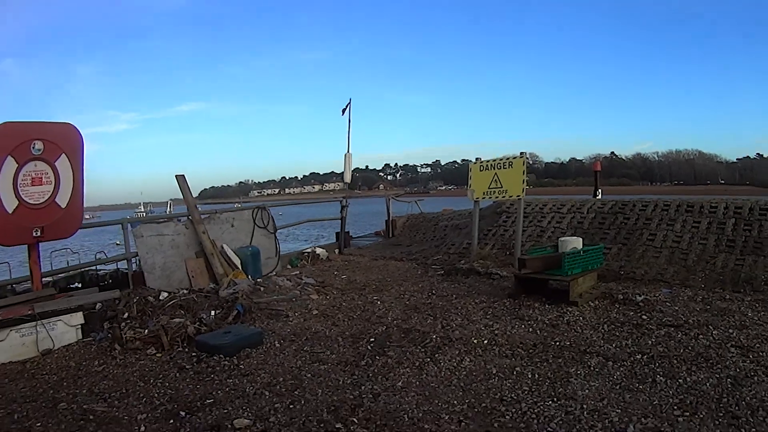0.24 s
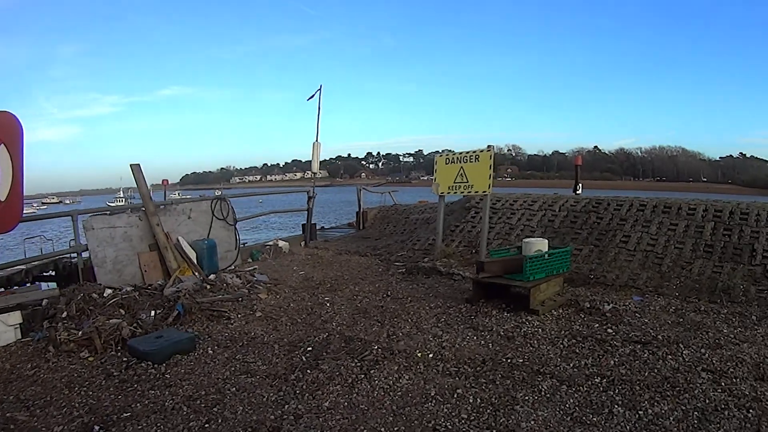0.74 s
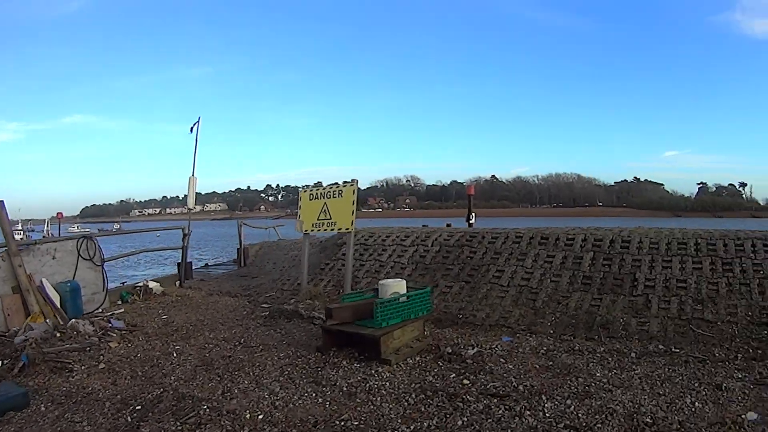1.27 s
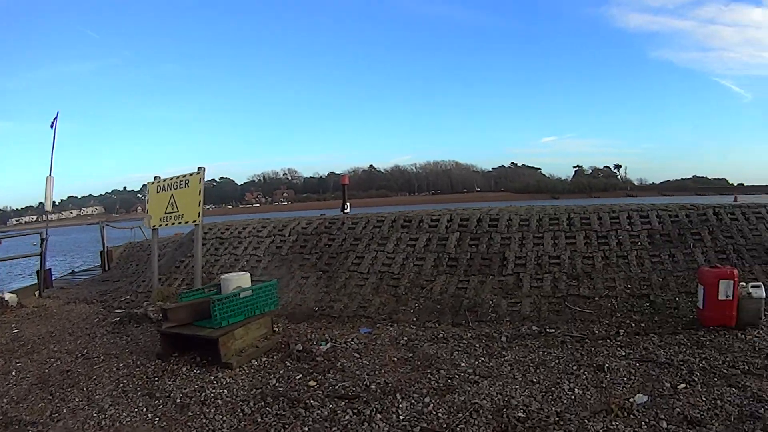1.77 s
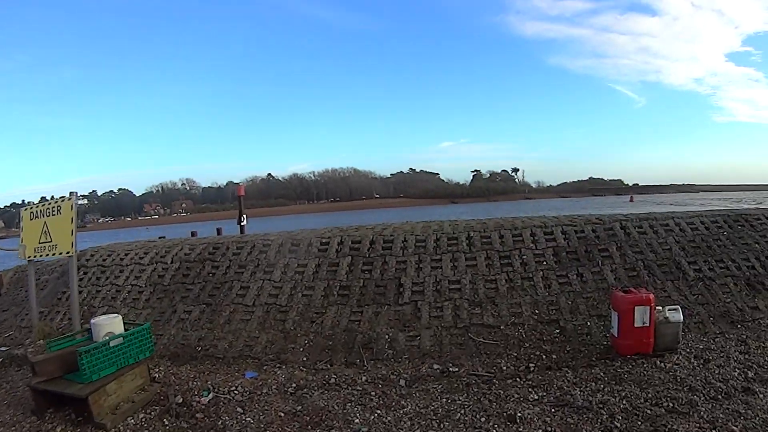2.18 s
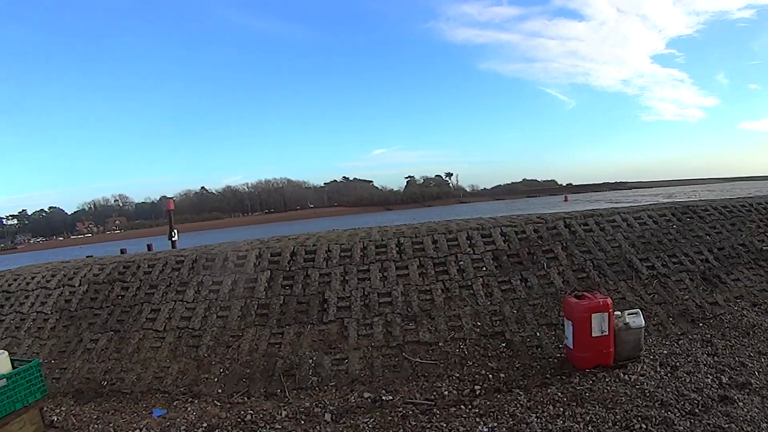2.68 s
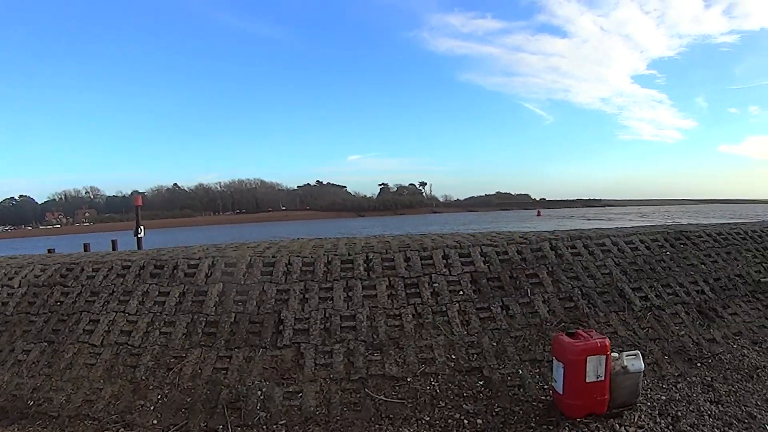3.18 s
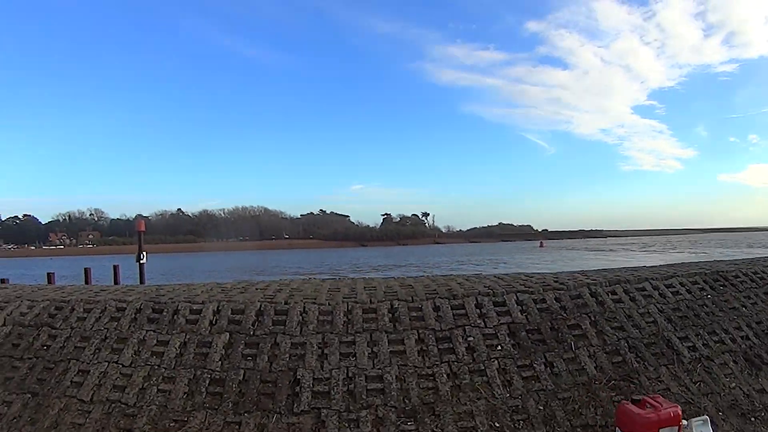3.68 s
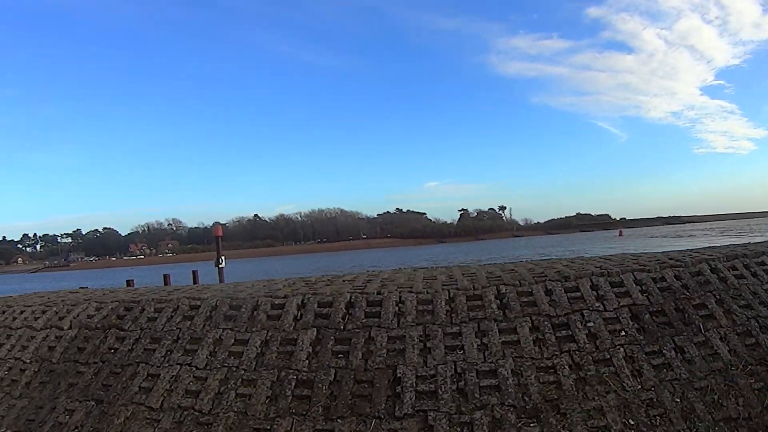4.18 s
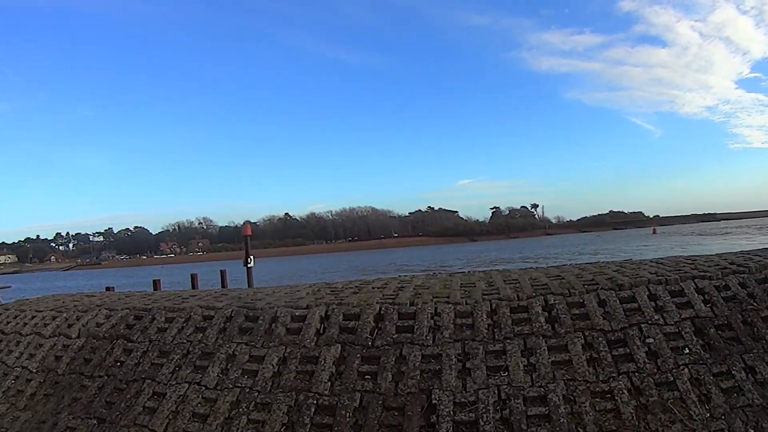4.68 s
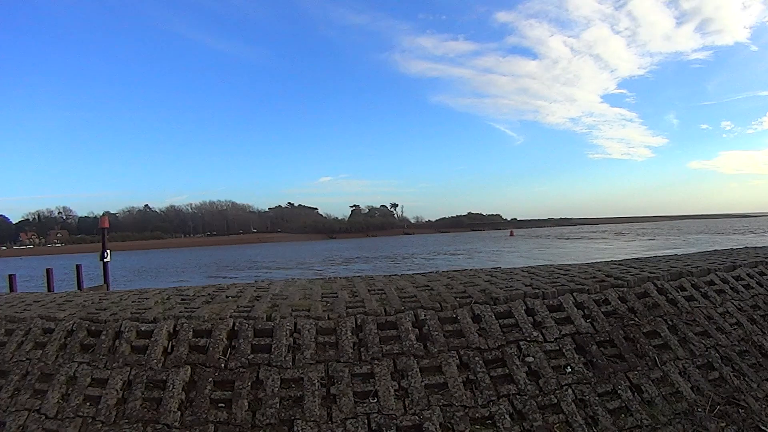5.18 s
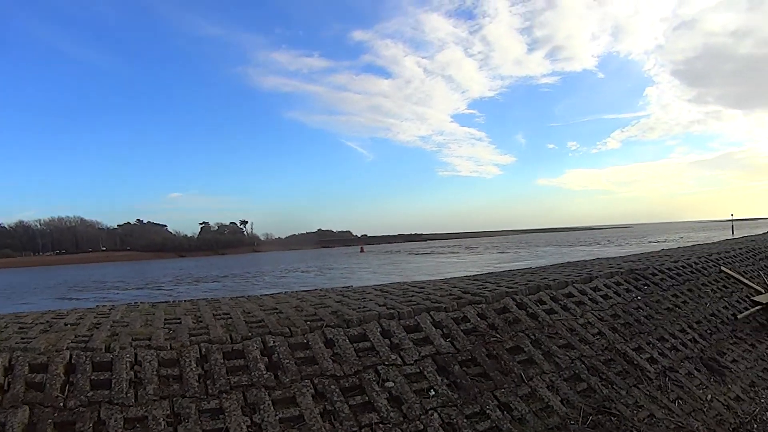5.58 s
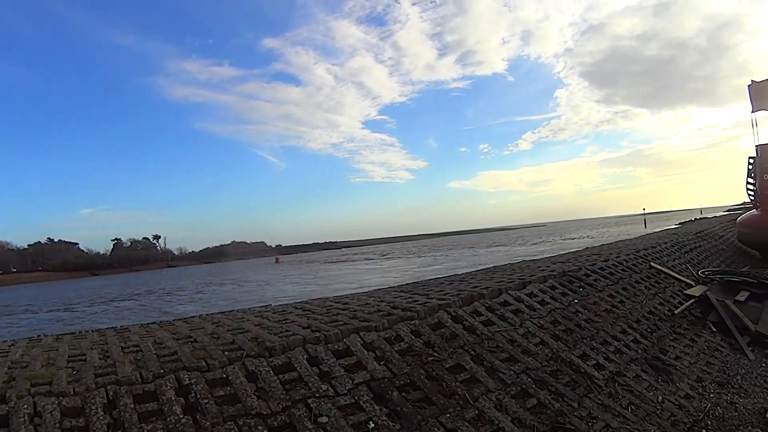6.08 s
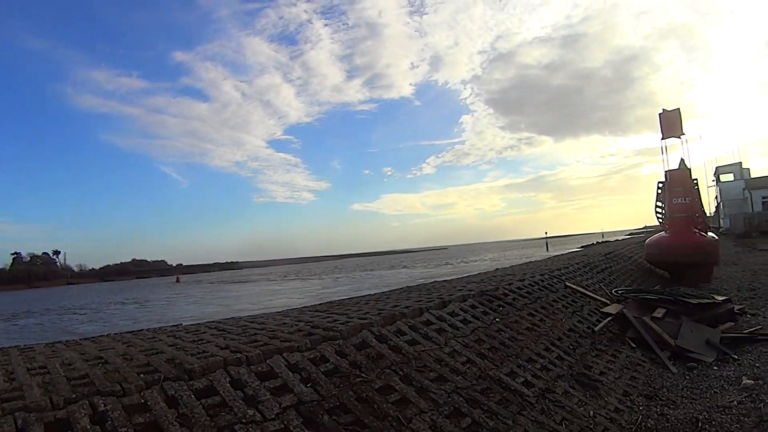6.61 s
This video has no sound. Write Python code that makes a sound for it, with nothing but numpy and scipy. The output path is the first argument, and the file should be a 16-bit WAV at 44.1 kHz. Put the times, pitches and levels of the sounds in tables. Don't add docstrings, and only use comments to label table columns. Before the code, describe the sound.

A person walks on a shingle beach with a small camera sealed in a plastic housing, so all contacts sound close, boxy and hollow, with little bass and a clipped treble. Irregular crunches swell around 0.2, 0.9, 1.7 and 2.6 seconds, made of gritty grains, hard pebble snaps and tiny high pings, with loose stones settling between. A strap brushes the case early and knocks it at 1.75 and 2.4. Another step at 3.4 runs into a heavy thump and knock at 3.5. Rubbing and creaking plastic follow, with a knock at 4.4, a soft drag near 5.0, two loud hard knocks at 5.4, a sudden scrape at 5.6 and a last knock at 5.8. Then steps alone crunch at 5.9 and 6.3, thinning to small clicks until about 6.9. Faint breeze rumble, distant water, hiss and a thin whine lie beneath.

```python
import sys
import numpy as np
from scipy import signal
from scipy.fft import rfft, irfft
from scipy.io import wavfile
from scipy.ndimage import uniform_filter1d

SR = 44100
rng = np.random.default_rng(int(sys.argv[2]) if len(sys.argv) > 2 else 0)


def decibels_to_gain(level_db):
    exponent = np.asarray(level_db, float) / 20
    return 10 ** exponent


def generate_wav(sig):
    pcm = np.round(np.clip(np.atleast_2d(sig).T, -1, 1) * 32767).astype(np.int16)
    wavfile.write(sys.argv[1], SR, pcm)


N = 302085

# start_s [s], peak_db [dB], body_share_db [dB]
THUMP_EVENTS = [(1.769, -74, -5), (2.401, -45.5, -2), (2.563, -56, 7.5), (2.609, -54, -2),
                (2.63, -56.5, 6.5), (3.527, -40, -17), (3.535, -23, 0.5), (4.243, -40, -19),
                (4.402, -40.5, -3), (4.96, -46, -13), (5.37, -29, 4), (5.455, -34.5, 6.5),
                (5.474, -38.5, -7), (5.577, -44, -6), (5.723, -34.5, -6), (5.7676, -36, -7),
                (5.831, -46, -8)]
# start_s [s], peak_db [dB], pitch_hz [Hz], first_tick_db [dB]
PING_EVENTS = [(0.388, -47.5, 7500, -2), (2.915, -53.5, 8700, -2), (1.073, -47, 7460, -10),
               (1.2553, -44, 5700, -4), (1.433, -43, 9570, -15), (1.431, -45.5, 5560, -15),
               (1.444, -47, 5450, -15), (0.7297, -53, 6770, -15), (1.738, -47, 7650, -15),
               (1.769, -43, 7620, -15), (2.2887, -51, 7730, -15), (4.9492, -42, 7620, -15),
               (6.2851, -51, 5350, -12), (6.349, -45, 5420, -12), (2.56, -37.5, 5440, -19),
               (2.7206, -39, 6070, -8), (2.7212, -38.5, 9500, -12), (4.3048, -42, 9000, -1),
               (4.733, -36, 9080, -8), (4.8868, -42, 5500, -8), (4.886, -39.5, 9800, -15),
               (5.397, -29, 7640, -25), (5.4551, -18, 5640, -15), (6.6503, -45.5, 7580, -11.5)]
RUB_ROUND = 1.2


def unit(x):
    return x / np.sqrt(np.mean(x ** 2))


def ring(x, hz, width_hz, pan_db, lead, sway=0):
    coupling = 2.37
    widths_hz = width_hz * np.array([1, coupling])
    mode, wall = np.exp((2j * np.pi * hz - np.pi * widths_hz) / SR)
    gain = (1 - abs(mode)) * (1 - abs(wall))
    z = signal.lfilter([gain], [1, -mode - wall, mode * wall], x)
    alike = np.cos(lead / 2) * z.imag
    opposed = (np.sin(lead / 2) + sway) * z.real
    return np.array([decibels_to_gain(pan_db / 2) * (alike + opposed), decibels_to_gain(-pan_db / 2) * (alike - opposed)])


def walk(rate):
    hold = int(SR / rate)
    steps = np.repeat(rng.standard_normal(N // hold + 1), hold)
    return unit(uniform_filter1d(steps, hold)[:N])


def grains(per_s, spread_db, dense):
    size = decibels_to_gain(spread_db * np.minimum(rng.exponential(size=N), 3.0))
    hits = (rng.random(N) < per_s / SR) * size * rng.standard_normal(N)
    return unit(unit(hits) + dense * rng.standard_normal(N))


def swells(s, db, swell_s, fade_s, rounded=1):
    step = 64
    late = np.arange(0, N + step, step) / SR - np.asarray(s)[:, None]
    rising, falling = -late / np.reshape(swell_s, (-1, 1)), late / np.reshape(fade_s, (-1, 1))
    away = np.where(late < 0, rising, falling)
    level_db = np.maximum(db[:, None] - 10 * away ** rounded, -200)
    power = np.sum(decibels_to_gain(level_db) ** 2, axis=0)
    return np.interp(np.arange(N) / step, np.arange(len(power)), power)


def knocks(s, peak_db, hz, rattle_ms, scatter_db, blow):
    t = np.arange(512)
    rise_ms = 0.7
    fade = np.exp(-1000 * t / (rattle_ms * SR))
    rise = np.tanh(1000 * t / (rise_ms * SR))
    rattle = rng.standard_normal((len(s), len(t))) * fade * rise
    rattle[:, 0] += blow * np.sqrt(np.sum(rattle ** 2, axis=1))
    at_mode = abs(np.sum(rattle * np.exp(-2j * np.pi * hz * t / SR), axis=1))
    energy = 0.7 * at_mode ** 2 + 0.3 * np.sum(rattle ** 2, axis=1)
    size = decibels_to_gain(peak_db + scatter_db * rng.standard_normal(len(s))) / np.sqrt(energy)
    out = np.zeros(N + len(t))
    np.add.at(out, (s * SR).astype(int)[:, None] + t, size[:, None] * rattle)
    return out[:N]


def part(modes, steady, s, knock_db, rattle_ms, scatter_db, own, spread, blow):
    power = sum(decibels_to_gain(db) ** 2 * np.pi * width / SR / 5 for hz, width, db, *_ in modes)
    chance = rng.standard_normal(N)
    sway = spread * walk(120)
    out = 0
    for hz, width, db, pan_db, lead in modes:
        share = (1 + own * np.roll(chance, rng.integers(N))) / np.hypot(1, own)
        drive = steady * share + knocks(s, knock_db, hz, rattle_ms, scatter_db, blow)
        out = out + ring(decibels_to_gain(db) * drive, hz, width, pan_db, lead, sway)
    return out / np.sqrt(power)


def contacts():
    # peak_s [s], level_db [dB], swell_s [s], fade_s [s]
    crunch_events = [(0.04, -53, 0.25, 0.12), (0.174, -41, 0.032, 0.057), (0.32, -54.5, 0.27, 0.12),
                     (0.936, -39.5, 0.074, 0.081), (1.05, -48, 0.065, 0.046), (1.41, -53, 0.2, 0.11),
                     (1.57, -48.5, 0.017, 0.1), (1.764, -35.5, 0.029, 0.018), (1.9, -52, 0.31, 0.033),
                     (2.079, -51.5, 0.11, 0.055), (2.37, -52, 0.38, 0.13), (2.566, -43, 0.027, 0.079),
                     (2.644, -47.5, 0.07, 0.062), (2.77, -60, .1, 0.14), (3.378, -42, 0.084, 0.038),
                     (4.139, -41, 0.025, 0.038), (4.256, -44, 0.035, 0.076), (4.41, -50, 0.051, 0.08),
                     (4.755, -49, 0.044, .15), (4.833, -44.5, 0.12, 0.077), (5.005, -43, 0.04, 0.04),
                     (5.18, -47, 0.078, 0.026), (5.82, -42, 0.098, 0.018), (5.937, -53, 0.14, 0.091),
                     (6.158, -49.5, 0.077, 0.049), (6.356, -46.5, 0.063, 0.16), (6.55, -73, .15, 0.09),
                     (6.739, -74, 0.074, 0.038), (6.85, -63, 0.044, .05)]
    # peak_s [s], level_db [dB], swell_s [s], fade_s [s], pressure_db [dB]
    brush_events = [
        (0.146, -48, 0.0065, 0.04, -10),
        (0.33, -54, 0.26, 0.1, -12),
        (1.764, -49.5, 0.016, 0.081, -6),
        (2.409, -56, 0.016, 0.033, 5.5),
        (2.6, -56, 0.08, 0.12, -2),
        (2.08, -57.5, 0.18, 0.33, -9),
    ]
    # peak_s [s], level_db [dB], swell_s [s], fade_s [s], pressure_db [dB]
    rub_events = [(3.49, -54.5, 0.2, 0.034, -10), (3.553, -41.5, 0.029, 0.056, 0),
                  (3.63, -50.5, 0.076, 0.0085, 3), (3.925, -46, 0.05, 0.034, 2),
                  (4.139, -50, 0.075, 0.059, -3), (4.256, -51, 0.042, 0.051, 2.5),
                  (4.41, -48, 0.055, 0.097, 5), (4.53, -51, 0.3, .03, -2.5),
                  (4.755, -51.5, 0.055, 0.044, -2), (4.968, -36.5, 0.032, 0.058, -0.5),
                  (5.18, -52, 0.16, 0.026, -0.5), (5.303, -48.5, 0.044, 0.2, -0.5),
                  (5.386, -44.5, 0.026, 0.029, 7.5), (5.46, -52.5, .05, 0.035, 5),
                  (5.582, -39.5, 0.0083, 0.047, 3), (5.64, -46, 0.038, 0.021, 0),
                  (5.43, -51, 0.036, 0.042, -14), (5.781, -45, 0.098, 0.015, 1),
                  (5.937, -53.5, 0.14, 0.1, 2.5), (6.356, -56, 0.041, 0.48, -2),
                  (6.74, -63.5, 0.11, .05, 6.5)]
    # level_db [dB] in cavity, wall, ports, shell
    rest_db = (-63.5, -74, -73.5, -74.5)
    step = swells(*np.transpose(crunch_events), 1.14)
    s, db, swell_s, fade_s, pressure_db = np.transpose(brush_events + rub_events)
    rub = swells(s, db, swell_s, fade_s, RUB_ROUND)
    pressed = swells(s, db + pressure_db, swell_s, fade_s, RUB_ROUND)
    in_wall = decibels_to_gain(-14) ** 2 * step + rub
    in_ports = decibels_to_gain(-19) ** 2 * step + decibels_to_gain(-5) ** 2 * rub
    in_shell = decibels_to_gain(-21) ** 2 * step + pressed
    powers = [step, in_wall, in_ports, in_shell]
    levels = [np.sqrt(power + decibels_to_gain(rest) ** 2) for power, rest in zip(powers, rest_db)]
    return levels + [decibels_to_gain(3) * np.sqrt(rub)]


def blows():
    # start_s [s],
    # peak_db [dB], hardness_db [dB]
    stone_events = [(0.149, -31.5, -1), (0.182, -28, -7), (0.39, -33.5, 2), (0.8968, -41, 8),
                    (0.9281, -20, -17), (0.946, -33, -6), (0.988, -30, -3), (1.615, -32, 1.5),
                    (1.6785, -32, -5), (1.699, -35.5, 9.5), (1.921, -36, 3), (2.5664, -31, 0),
                    (3.325, -40, -6), (0.188, -30.5, -5), (0.16, -36, -7), (3.354, -38, 0),
                    (3.3711, -28, -2.5), (3.383, -30.5, -3), (3.4083, -32, -13), (4.1177, -37, -4),
                    (4.818, -29.5, -13), (4.845, -33, -5), (4.8973, -25.5, 2), (5.708, -31, -12),
                    (5.7237, -35, 0), (5.8013, -35, -4), (5.826, -30, -12), (5.9207, -26, -4),
                    (6.3376, -25, 0), (6.5712, -37, 3),
                    (0.038, -42, -1), (0.2514, -33, 3), (0.311, -34.5, -7), (0.4085, -33.5, -8),
                     (0.7219, -36.5, 3.5), (0.84, -46, 9), (0.971, -35, -9), (1.4141, -34, -11),
                     (1.496, -34.5, -10), (1.5595, -38, 0), (2.074, -50, 15), (2.3275, -39, -6),
                     (2.6286, -38, 8), (2.6516, -43, 5), (2.767, -39, -3), (2.9577, -37.5, 7),
                     (3.024, -27, -3.5), (3.108, -32, 5), (3.2068, -34, 7), (3.7249, -45.5, -5),
                     (4.6, -40, 0), (6.014, -35, -6), (6.2684, -34, -15), (6.5042, -46, -4),
                    (0.116, -40, -3), (0.1535, -30, 2), (0.2911, -38, -3), (0.592, -43, -7),
                   (1.037, -39, -5), (1.359, -41, 3), (1.3793, -42, -3), (1.4066, -40, -5),
                   (1.459, -40, -3), (1.5654, -40, -3), (1.5784, -44, -3), (1.6684, -35.5, -3),
                   (1.7074, -35, -1), (1.7184, -36, -5), (1.7518, -31, -1), (1.76, -24.5, -6),
                   (1.778, -31, -3), (1.903, -37, -3), (2.093, -37, -3), (2.132, -40, -1),
                   (2.1413, -41, -3), (2.192, -46, 0), (2.269, -39, 1), (2.312, -40, -3), (2.5323, -42, -3),
                   (2.56, -36, -6), (2.616, -41, -3), (3.275, -41, 6), (3.292, -40, 2), (3.3417, -36, -3),
                   (3.3922, -31.5, -7), (3.436, -37, -5), (4.088, -43, -3), (4.101, -38, -2),
                   (4.138, -33, -3), (4.2047, -39, -1), (4.2746, -35, -5), (4.516, -38, -5),
                   (4.6956, -41.5, 1), (4.73, -42, -3), (4.746, -37, -3), (4.931, -42, -3),
                   (4.9447, -34, -3), (4.951, -29, -3), (5.0558, -40, -5), (5.305, -38, -3),
                   (5.5807, -31, -3), (5.6696, -35, -6), (5.79, -35, -3), (5.8162, -34, -7),
                   (5.871, -37.5, -1), (5.9462, -40, -3), (5.9957, -37.5, 2), (6.135, -39.5, -1),
                   (6.3673, -45, -1)]
    # [dB, shares]
    knock_events = [(1.74, -28.5, -14.5, -21, -20), (1.769, -18.5, -21, -30, -35),
                    (2.401, -19.5, -4, -10, -17), (2.4062, -44, -3, -18, -25), (2.5554, -40.5, -8, -25, -5),
                    (3.4459, -38, -20, -10.5, -18), (3.467, -41, -11, -7, -8),
                    (3.5353, -11, -10, -13.5, -23.5), (3.5642, -27, -22, -14, -21),
                    (3.585, -31, -8, -1.5, -8.5), (4.1306, -38.5, -7, -7, -5), (4.18, -42, -24, 0.5, -4),
                    (4.2435, -32.5, -7.5, -12, -16), (4.4052, -15.5, -9, -9, -15.5),
                    (5.3711, -12, -5.5, -16.5, -12), (5.4535, -28, 2, -6, -12), (5.498, -44, -14, -4, -12),
                    (5.4559, -15.5, -2, -16, -13), (5.577, -33.5, -5, -3.5, -26),
                    (5.7333, -30, -16, -25, -22), (5.7675, -22, -4, -16.5, -20)]
    in_shell_db, in_wall_db, in_ports_db, in_lid_db = -37, -25, -25, -8

    s, db, hard_db = np.transpose(stone_events)
    stones = [s, db, db + in_shell_db, db + in_wall_db + hard_db,
              db + in_ports_db + hard_db, db + in_lid_db + hard_db]

    s, db, _, first_db = np.transpose(PING_EVENTS)
    tick_db = db + first_db
    low_db = tick_db - 4
    bright = [s, low_db, low_db + in_shell_db, low_db + in_wall_db, tick_db, low_db + in_lid_db]

    s, db, *share_db = np.transpose(knock_events)
    lid_db = db - 2.5 + 0.44 * share_db[1]
    hard = [s, db, *(db + share_db), lid_db]
    return np.hstack([stones, hard, bright])


def muffled(x, low_hz, high_hz):
    band = signal.butter(2, [low_hz, high_hz], "band", fs=SR, output="sos")
    return unit(signal.sosfilt(band, x))


def air_cavity(airborne, s, peak_db):
    # pitch_hz [Hz], width_hz [Hz], level_db [dB], pan_db [dB, left minus right], left_lead [rad]
    cavity_modes = [(1316, 115, -12, 8, -0.86), (1597, 157, 4, -2.5, -0.37), (1747, 203, -2, -0.5, -0.4)]
    return part(cavity_modes, airborne, s, peak_db + 15.5, rattle_ms=1.7, scatter_db=0.77,
                own=0.046, spread=0.14, blow=1.18)


def lid(airborne, s, lid_db):
    # pitch_hz [Hz], width_hz [Hz], level_db [dB], pan_db [dB, left minus right], left_lead [rad]
    lid_modes = [(1900, 314, 2.5, 0, -0.55), (2276, 440, -6.5, 0, 0)]
    return part(lid_modes, decibels_to_gain(-10) * airborne, s, lid_db + 14.5, rattle_ms=0.68, scatter_db=0.2,
                own=0.3, spread=0.15, blow=1.4)


def side_wall(friction, s, wall_db):
    # pitch_hz [Hz], width_hz [Hz], level_db [dB], pan_db [dB, left minus right], left_lead [rad]
    wall_modes = [(2014, 560, 2, 0.48, 0), (2500, 570, -2, -0.24, 1.5), (2987, 305, 5, 1, 1.79),
                  (3330, 410, -13, -0.84, 4)]
    return part(wall_modes, decibels_to_gain(-1.5) * friction, s, wall_db + 21.5, rattle_ms=2.4, scatter_db=3.0,
                own=1.95, spread=0.25, blow=0.78)


def microphone_ports(friction, s, tick_db):
    # pitch_hz [Hz], width_hz [Hz], level_db [dB], pan_db [dB, left minus right], left_lead [rad]
    port_modes = [(3540, 130, -3, 7.5, 1.5), (4750, 970, 2.5, -4.5, 1.17), (5483, 480, 4.5, 0, 0.13),
                  (6680, 330, -5, -8.5, 2), (7538, 680, -1, 0, 0.92), (8570, 350, -2.5, 0, -1.4),
                  (9720, 2200, -7, 1, 1.35)]
    return part(port_modes, decibels_to_gain(-0.6) * friction, s, tick_db + 18.0, rattle_ms=2.5, scatter_db=0.6,
                own=1.4, spread=0.28, blow=0.23)


def outer_shell(creaking, s, shell_db):
    # pitch_hz [Hz], width_hz [Hz], level_db [dB], pan_db [dB, left minus right], left_lead [rad]
    shell_modes = [(749, 125, -2, -6, -1.38), (970, 59, -9, -3, -1.57), (1089, 202, -7, -4.5, -1.46)]
    return part(shell_modes, decibels_to_gain(-3.5) * creaking, s, shell_db + 19.5, rattle_ms=2.1, scatter_db=0.3,
                own=1.07, spread=0.5, blow=1.23)


def camera_body(creaking, rumble):
    # pitch_hz [Hz], width_hz [Hz], level_db [dB], pan_db [dB, left minus right], left_lead [rad]
    body_modes = [(331, 44, 0, 1.8, -1.46), (430, 92, 1.4, 0.82, -1.62)]
    s, db, share_db = np.transpose(THUMP_EVENTS)
    return part(body_modes, decibels_to_gain(-10.0) * (creaking + 0.5 * rumble), s + 0.00185, db + share_db + 22.5,
                rattle_ms=3.6, scatter_db=-4.0, own=0.91, spread=0.36, blow=1.6)


def hand_grip(rumble):
    # pitch_hz [Hz], width_hz [Hz], level_db [dB], pan_db [dB, left minus right], left_lead [rad]
    grip_modes = [(116, 123, 2, -1, -0.17), (204, 180, -6, .3, -0.51)]
    s, db, _ = np.transpose(THUMP_EVENTS)
    return part(grip_modes, decibels_to_gain(-3.5) * rumble, s, db + 21.5, rattle_ms=4.7, scatter_db=1.5,
                own=0.57, spread=0.082, blow=1.65)


def carrying_arm(rumble):
    # pitch_hz [Hz], width_hz [Hz], level_db [dB], pan_db [dB, left minus right], left_lead [rad]
    arm_modes = [(55.5, 71, -1, -1.2, -.2)]
    s, db, _ = np.transpose(THUMP_EVENTS)
    return part(arm_modes, decibels_to_gain(-4.0) * rumble, s, db + 3, rattle_ms=3.1, scatter_db=2.5,
                own=0.57, spread=0.082, blow=2.3)


def spots():
    # start_s [s], peak_db [dB], pitch_hz [Hz], width_hz [Hz]
    spot_events = [(2.401, -34, 4530, 1500), (3.5358, -25, 328, 120), (3.5358, -25, 760, 150),
                   (3.5358, -28, 2350, 400), (3.5852, -35, 2900, 900), (3.5852, -36, 5200, 1500),
                   (4.4058, -26, 2100, 300), (4.406, -33, 2380, 300), (4.4056, -34, 3150, 350),
                   (4.4055, -34.5, 402, 120), (5.371, -22, 2030, 350), (5.371, -22, 900, 200),
                   (5.371, -30, 8500, 2500), (5.456, -27, 463, 90), (5.456, -26, 613, 150),
                   (5.456, -26, 1790, 250), (5.4565, -33, 987, 90), (5.7677, -28, 150, 90),
                   (5.7675, -26.5, 740, 110), (3.371, -36, 2200, 700), (6.3382, -33, 2100, 600),
                   (1.6785, -36, 1900, 500)]
    blow = np.arange(2048) == 0
    out = np.zeros((2, N))
    for s, db, hz, width in spot_events:
        sound = ring(blow, hz, width, pan_db=-2.0, lead=-0.6)
        start = int(s * SR)
        out[:, start:start + len(blow)] += decibels_to_gain(db) * sound / abs(sound).max()
    return out


def pings(width_hz, rattle_ms, gain_db):
    t = np.arange(1024) / SR
    out = np.zeros((2, N))
    for s, db, hz, _ in PING_EVENTS:
        chatter = rng.standard_normal(len(t)) * np.exp(-1000 * t / rattle_ms)
        sound = ring(chatter, hz, width_hz, pan_db=3.3 * rng.standard_normal(), lead=rng.standard_normal())
        start = int(s * SR)
        out[:, start:start + len(t)] += decibels_to_gain(db + gain_db) * sound / abs(sound).max()
    return out


def fingernail():
    # peak_s [s], level_db [dB], swell_s [s], fade_s [s]
    scrape_events = [
        (4.06, -56, 0.0091, .06),
        (5.58, -41, 0.005, 0.078),
        (4.96, -52, 0.033, 0.06),
    ]
    # pitch_hz [Hz], width_hz [Hz], level_db [dB], pan_db [dB, left minus right], left_lead [rad]
    nail_modes = [(1400, 220, -2, 0, -0.4), (2320, 300, 0.5, 0, 0.64), (3220, 300, -2.5, 0, 1.4)]
    level = np.sqrt(swells(*np.transpose(scrape_events), rounded=2.7))
    out = 0
    for hz, width, db, pan_db, lead in nail_modes:
        grit = grains(per_s=1200, spread_db=3.5, dense=0.4)
        out = out + decibels_to_gain(db) * ring(grit, hz, width, pan_db, lead)
    return level * unit(out)


def swish():
    # peak_s [s], level_db [dB], swell_s [s], fade_s [s]
    swish_events = [(0.155, -56, .03, 0.038), (2.62, -60, .06, .05), (3.57, -60, 0.071, 0.046),
                    (3.92, -60, 0.032, .04), (4.16, -55.5, 0.039, .05), (4.26, -60, 0.033, .04),
                    (4.74, -54.5, .02, 0.054), (4.98, -46, 0.047, 0.061), (5.4, -42.5, 0.046, 0.037),
                    (5.44, -43, 0.034, 0.02), (5.78, -63, 0.057, .02), (3.46, -56, 0.032, 0.045)]
    # pitch_hz [Hz], width_hz [Hz], level_db [dB]
    swish_modes = [(5070, 3200, 0), (7650, 740, 0.5), (9140, 1700, -1.5)]
    level = np.sqrt(swells(*np.transpose(swish_events), RUB_ROUND)) * unit(decibels_to_gain(1.8 * walk(60)))
    out = 0
    for hz, width, db in swish_modes:
        cloth = grains(per_s=2300, spread_db=-8.0, dense=0.74)
        out = out + decibels_to_gain(db) * ring(cloth, hz, width, 0, 0, 0.75 * walk(400))
    return level * unit(out)


def shaking():
    # time_s [s], level_db [dB]
    breeze_curve = [(0.0, -72), (0.519, -63), (0.67, -78), (0.748, -69), (1.064, -59.5), (1.345, -66.5),
                    (2.183, -60), (2.498, -74), (2.748, -60.5), (3.251, -73.5), (3.6, -64), (3.8, -72),
                    (4.256, -58), (4.61, -68.5), (4.947, -55.5), (5.12, -65.5), (5.7, -57), (5.978, -52.5),
                    (6.1, -83)]
    s, db = np.transpose(breeze_curve)
    thump_s, thump_db, _ = np.transpose(THUMP_EVENTS)
    shudder = swells(thump_s, thump_db - 21, swell_s=0.015, fade_s=0.039)
    breeze = decibels_to_gain(np.interp(np.arange(N) / SR, s, db))
    return np.sqrt(breeze ** 2 + shudder)


def coloured(spectrum, level_db):
    hz, db = np.transpose(spectrum)
    f = np.maximum(np.fft.rfftfreq(N, 1 / SR), 1)
    colour = decibels_to_gain(np.interp(np.log(f), np.log(hz), db))
    return decibels_to_gain(level_db) * unit(irfft(rfft(rng.standard_normal(N)) * colour, N))


def background():
    # pitch_hz [Hz], density_db [dB per Hz]
    mid_spectrum = [(15, -25), (30, 4), (75, -7), (270, -11.5), (880, -15.5), (1350, -15), (1590, -14.5),
                    (2300, -18.5), (3000, -17), (3900, -19.5), (5600, -19), (6300, -20), (10200, -21.5),
                    (11500, -25)]
    # pitch_hz [Hz], density_db [dB per Hz]
    side_spectrum = [(15, -46), (25, -20), (296, -1), (1550, -1.5), (2390, -6.5), (3080, -6.5), (4990, -12),
                     (6960, -16), (10200, -19), (11000, -21), (14300, -53), (22000, -120)]
    mid, side = coloured(mid_spectrum, -59), coloured(side_spectrum, -58)
    whine = unit(ring(rng.standard_normal(N), hz=6740, width_hz=120, pan_db=-8, lead=1.5))
    return np.array([mid + side, mid - side]) + decibels_to_gain(-73) * whine


def scene():
    crunch, scrape, hiss, creak, slide = contacts()
    s, peak_db, shell_db, wall_db, tick_db, lid_db = blows()
    pebbles = grains(per_s=330, spread_db=2.0, dense=0.72) * unit(decibels_to_gain(1.5 * walk(45)))
    rubbing = grains(per_s=700, spread_db=2.6, dense=1.0) * unit(decibels_to_gain(2.8 * walk(40)))
    steps_in_air = crunch * muffled(pebbles, low_hz=1186, high_hz=2310)
    rubs_in_air = slide * muffled(rubbing, low_hz=1255, high_hz=2380)
    airborne = decibels_to_gain(-14.0) * (steps_in_air + rubs_in_air)
    on_wall = (0.76 * pebbles + 0.81 * rubbing) * scrape
    creaking = rubbing * creak
    rumble = rng.standard_normal(N) * unit(decibels_to_gain(3.8 * walk(13))) * shaking()

    out = air_cavity(airborne, s, peak_db) + lid(airborne, s, lid_db)
    out += side_wall(on_wall, s, wall_db)
    out += microphone_ports(rubbing * hiss, s, tick_db)
    out += outer_shell(creaking, s, shell_db)
    out += camera_body(creaking, rumble) + hand_grip(rumble) + carrying_arm(rumble)
    out += spots() + pings(width_hz=290, rattle_ms=2.3, gain_db=-1.5)
    out += fingernail() + swish()
    return out + background()


def top_cut(x):
    return signal.sosfilt(signal.butter(12, 12010, fs=SR, output="sos"), x)


def record(dry):
    top = signal.ellip(N=10, rp=0.2, rs=60, Wn=11000, fs=SR, output="sos")
    bass = signal.butter(N=1, Wn=28.6, btype="high", fs=SR, output="sos")
    mix = signal.sosfilt(np.vstack([top, bass]), dry)
    return top_cut(mix)


dry = scene()
out = record(dry)
generate_wav(out)
```